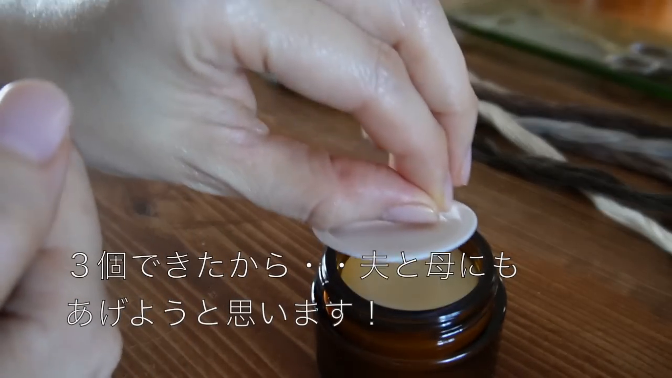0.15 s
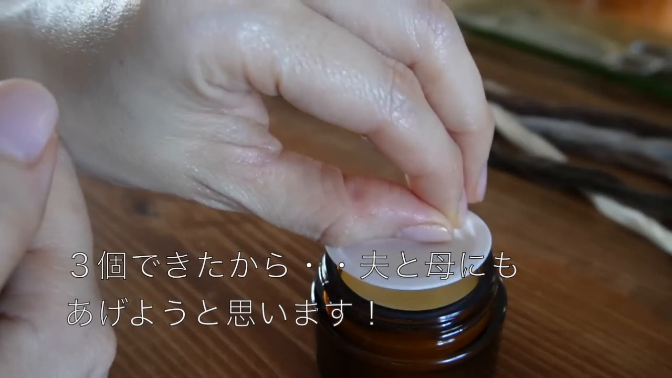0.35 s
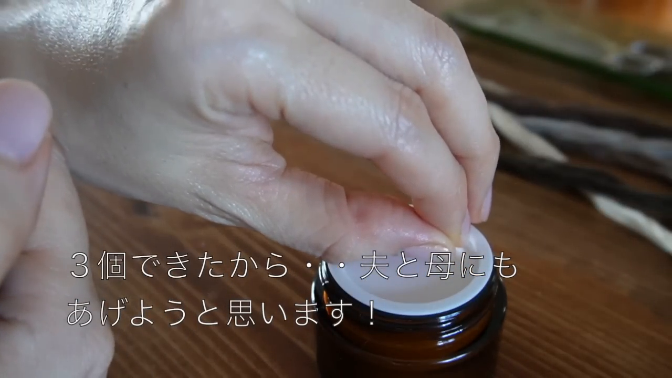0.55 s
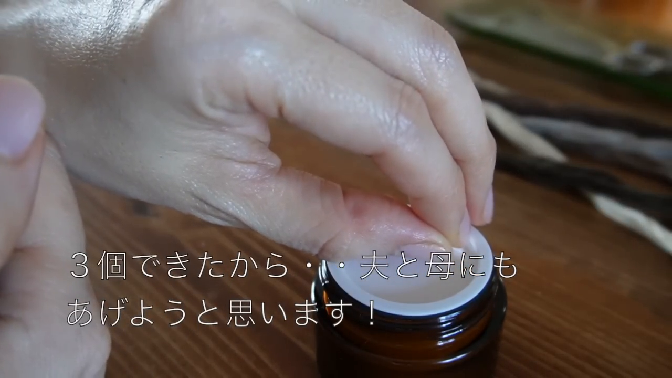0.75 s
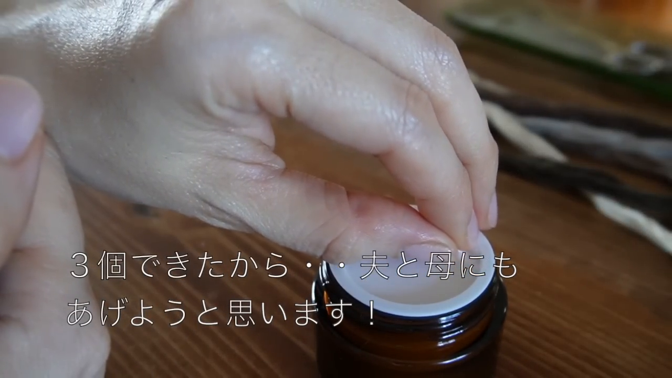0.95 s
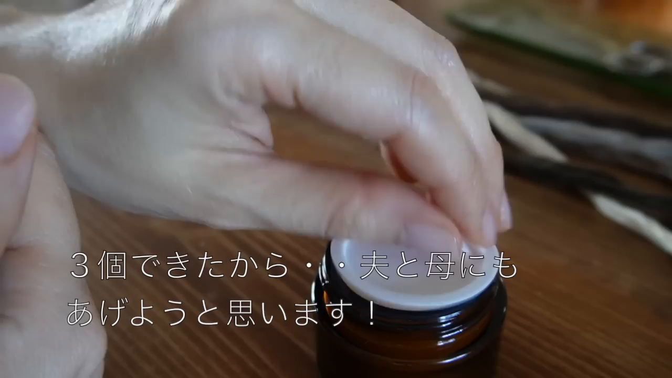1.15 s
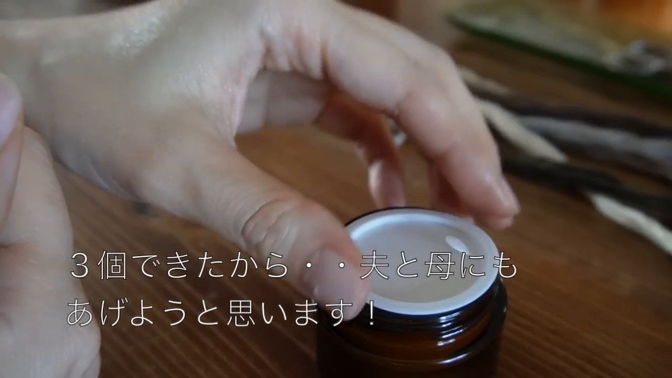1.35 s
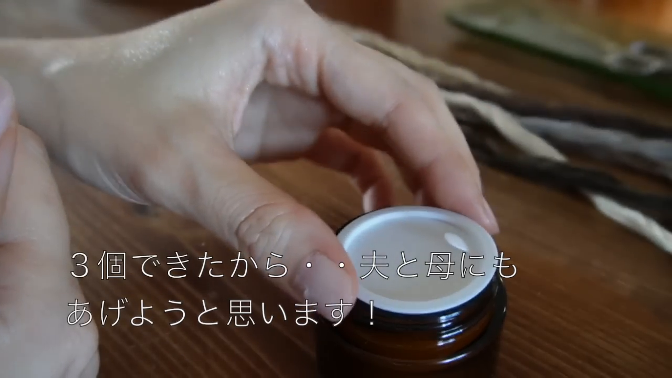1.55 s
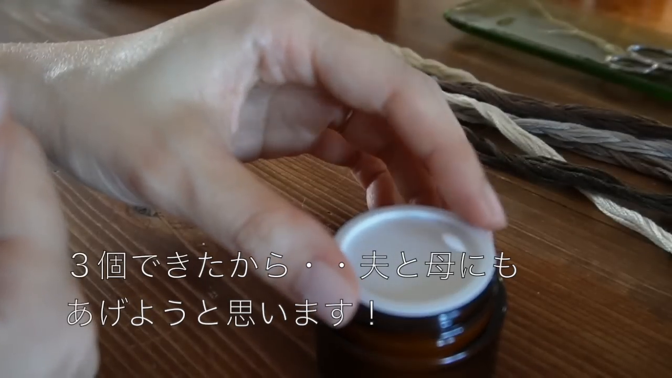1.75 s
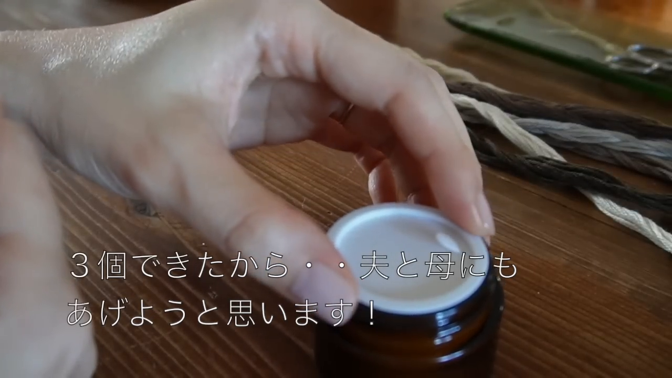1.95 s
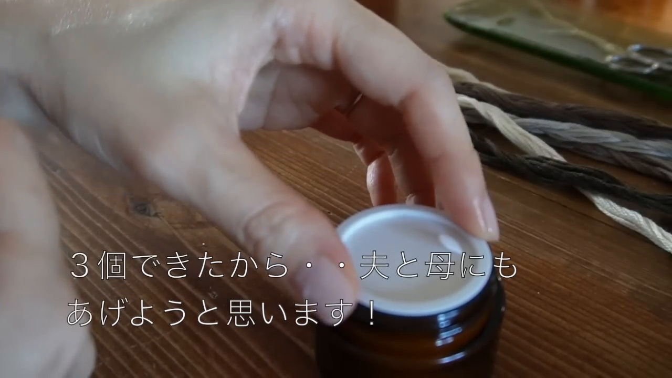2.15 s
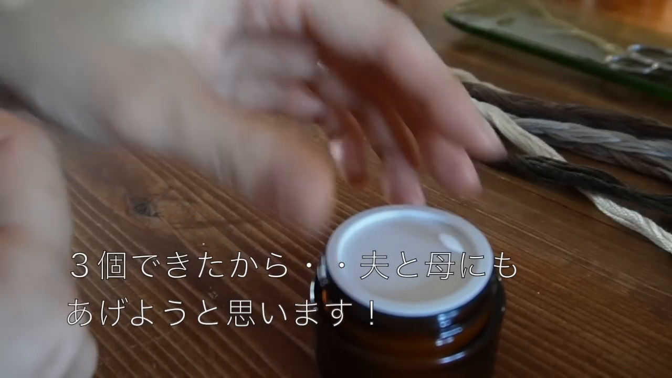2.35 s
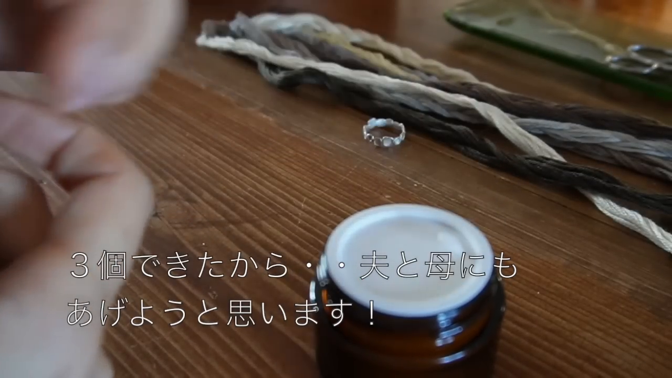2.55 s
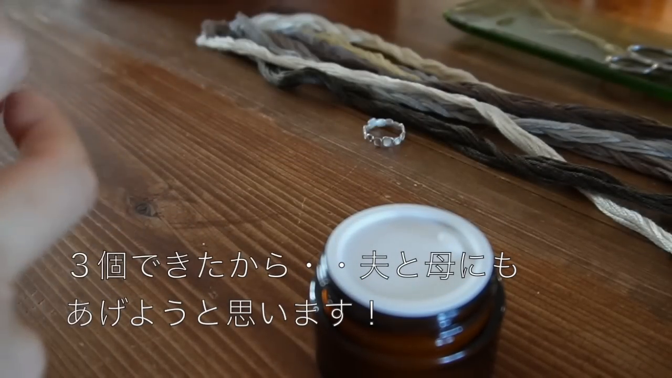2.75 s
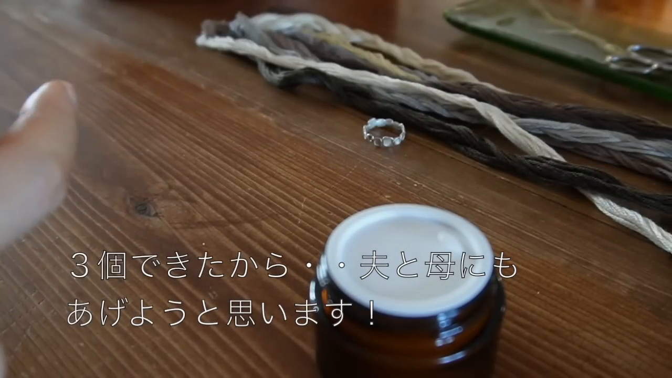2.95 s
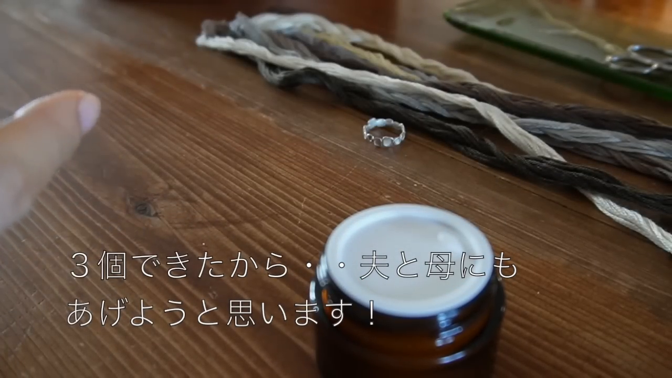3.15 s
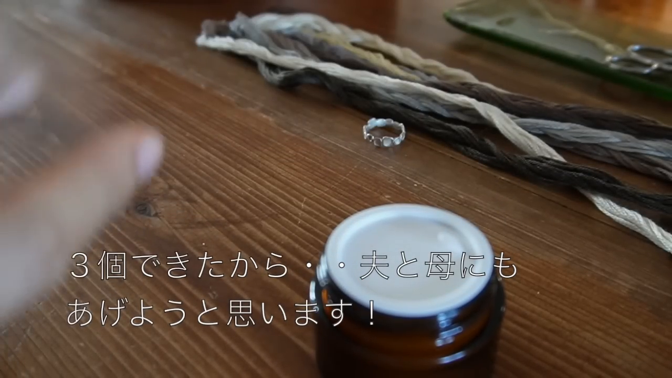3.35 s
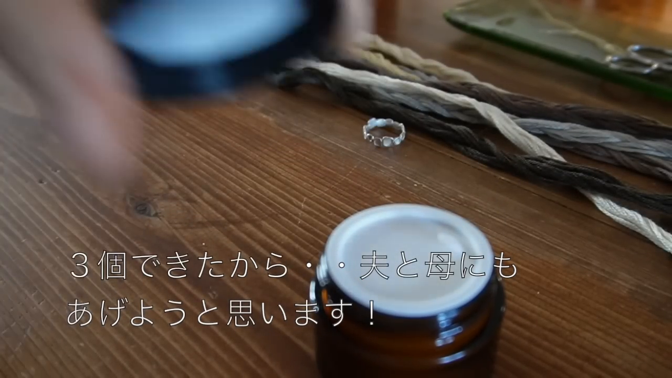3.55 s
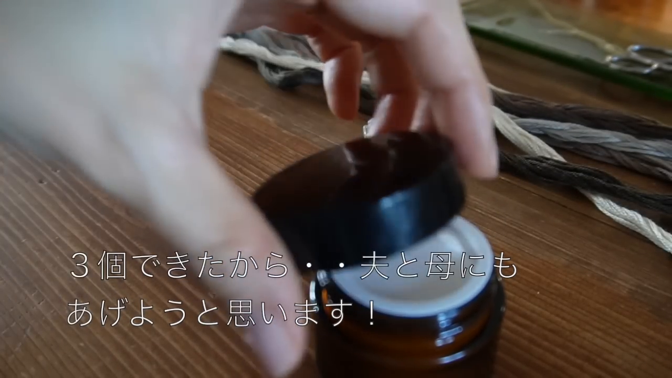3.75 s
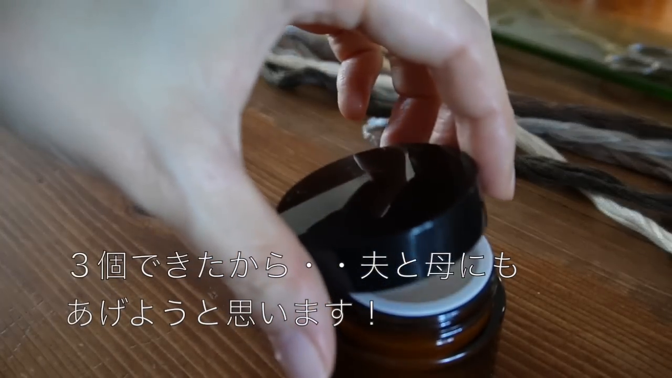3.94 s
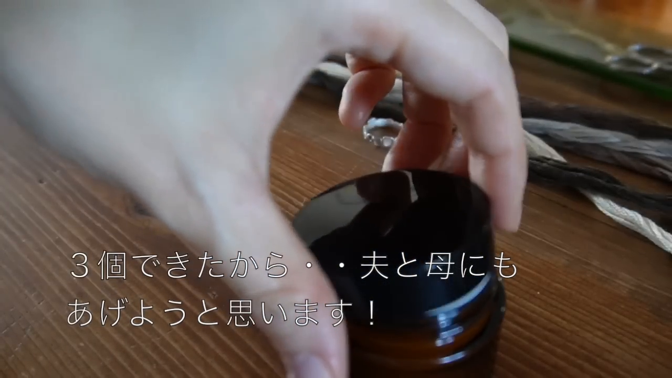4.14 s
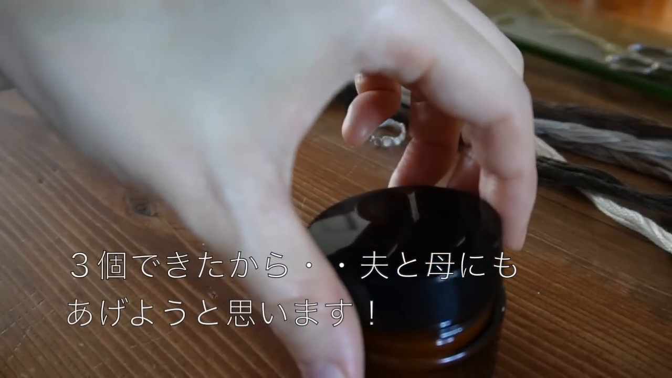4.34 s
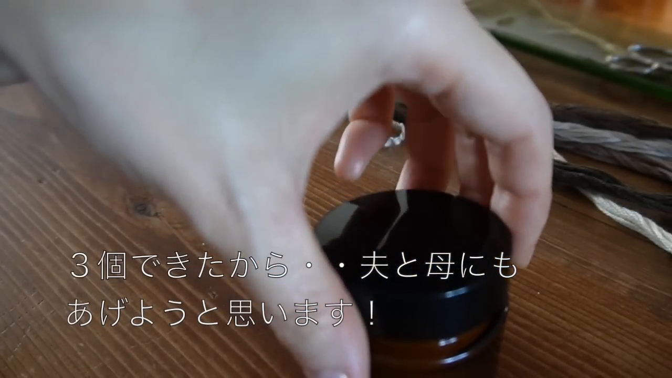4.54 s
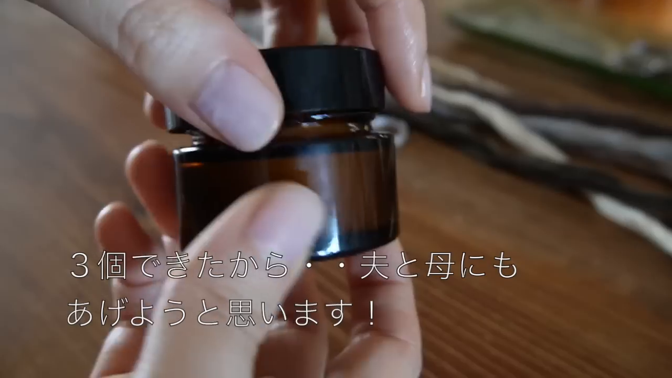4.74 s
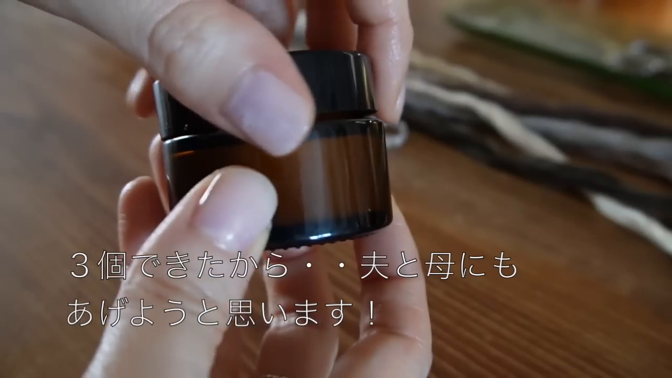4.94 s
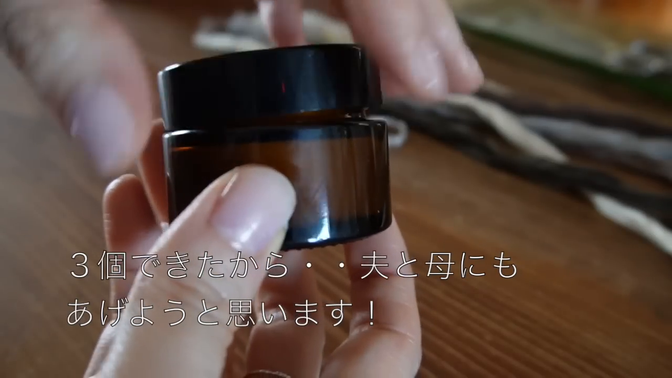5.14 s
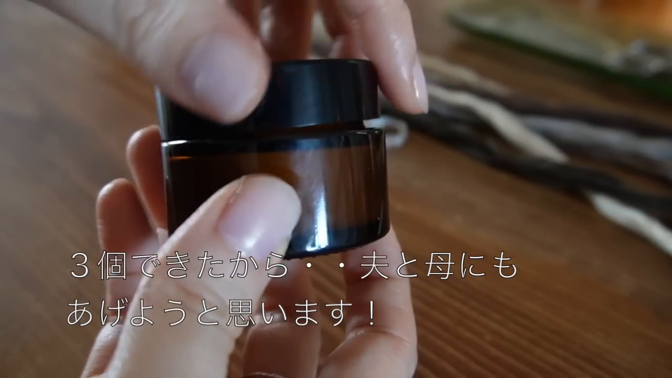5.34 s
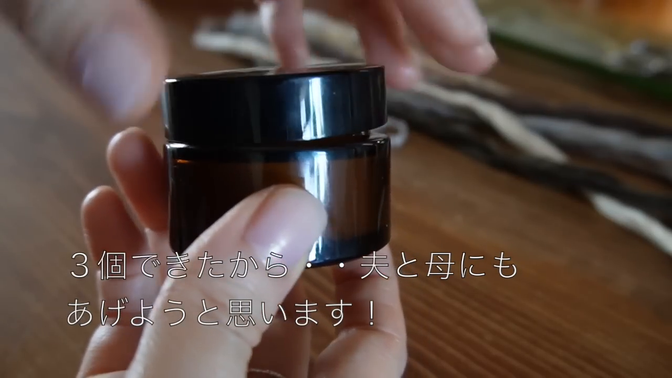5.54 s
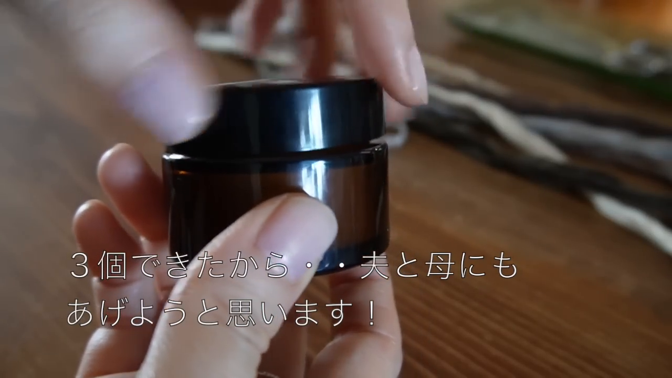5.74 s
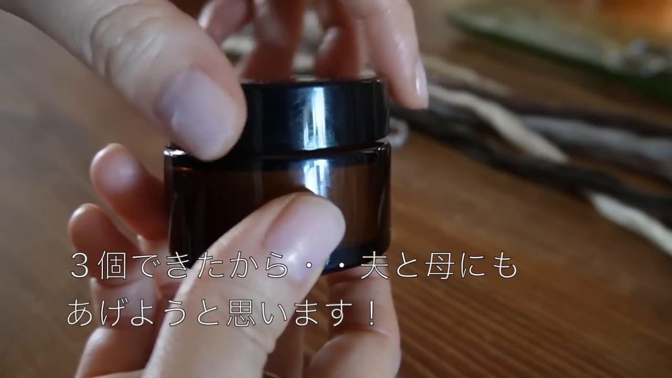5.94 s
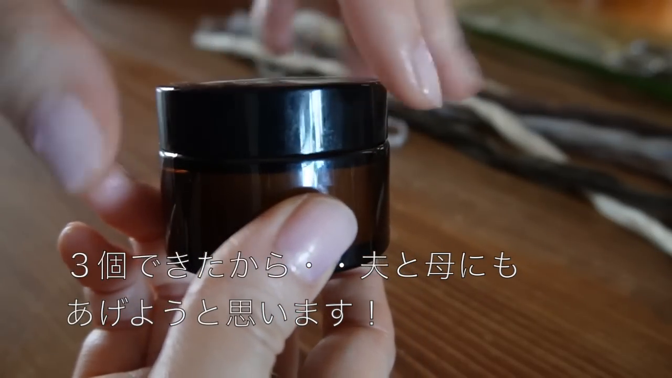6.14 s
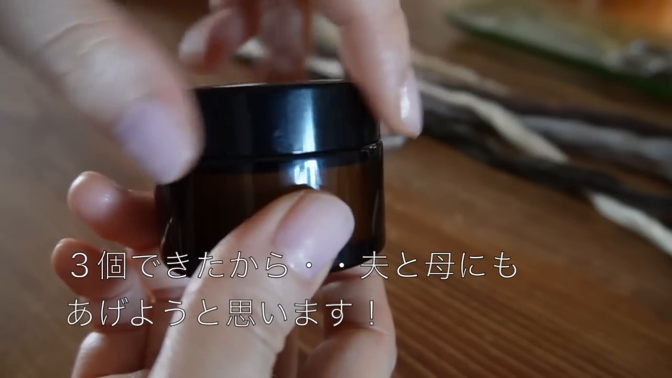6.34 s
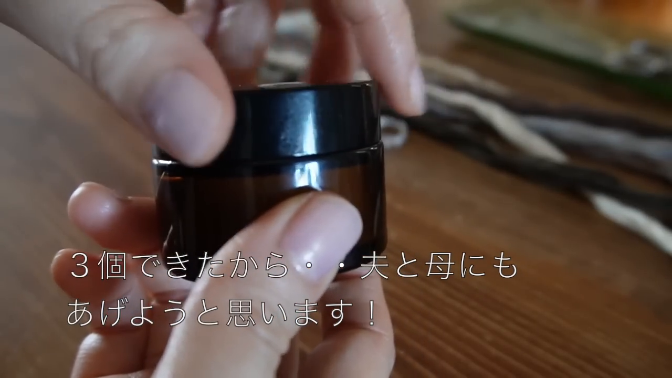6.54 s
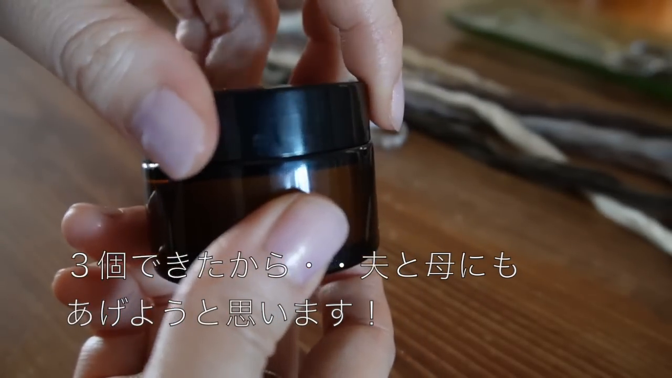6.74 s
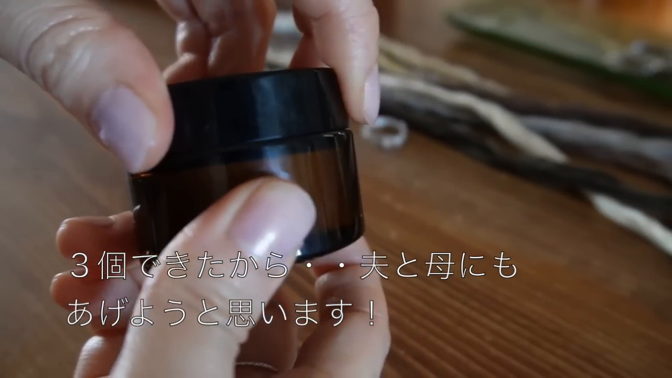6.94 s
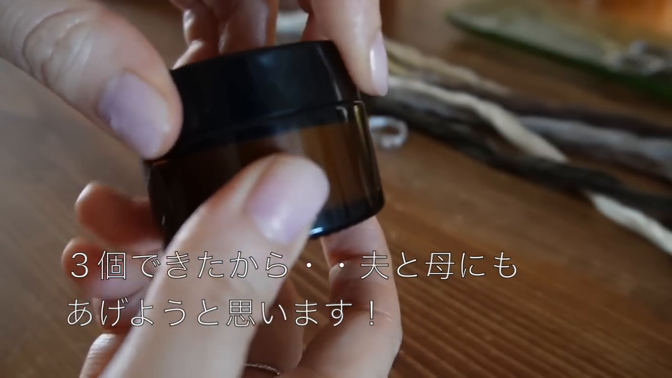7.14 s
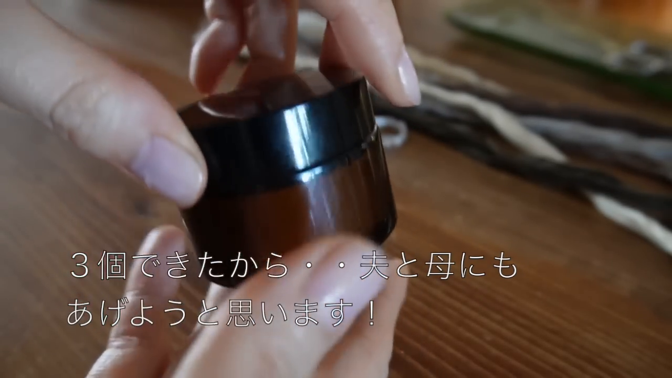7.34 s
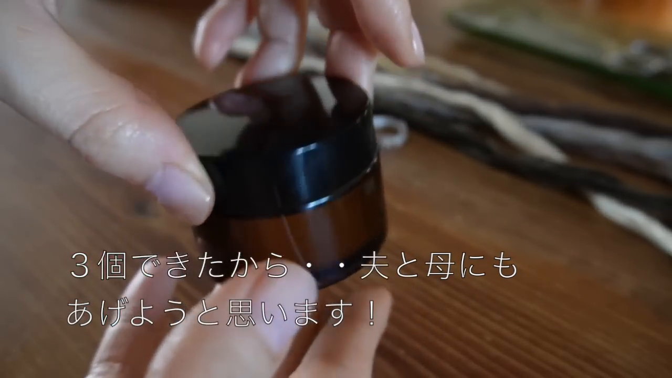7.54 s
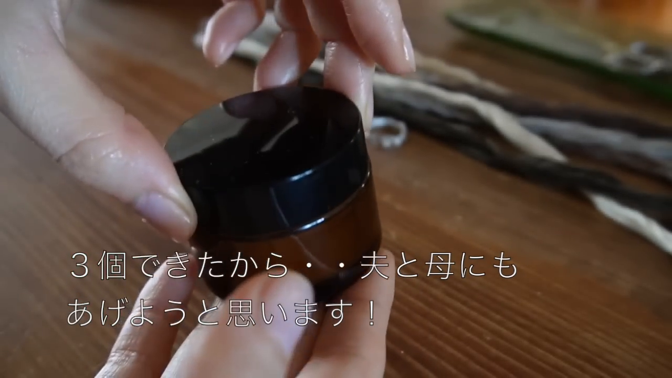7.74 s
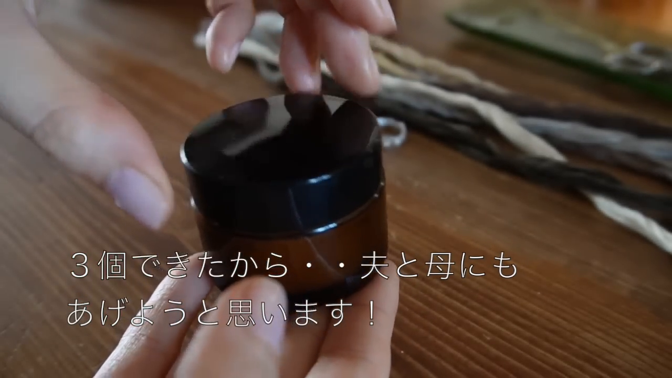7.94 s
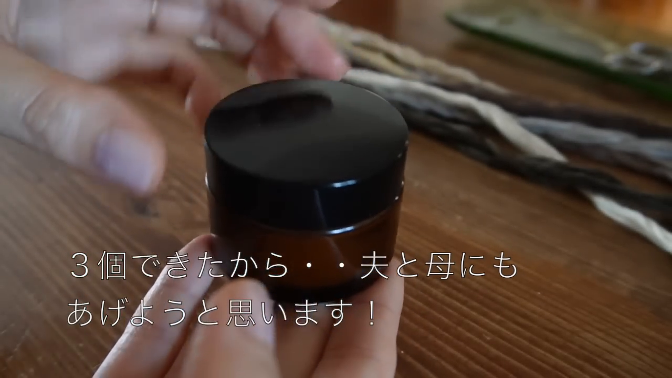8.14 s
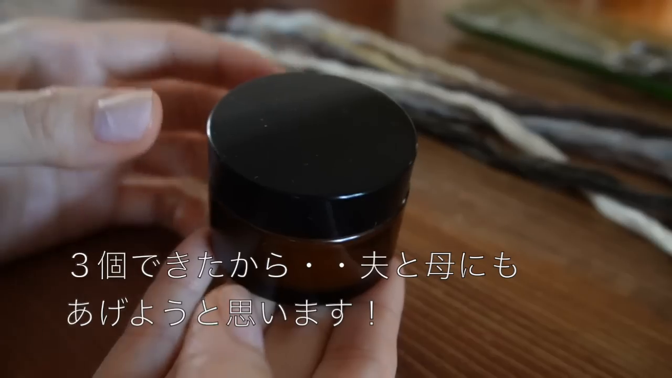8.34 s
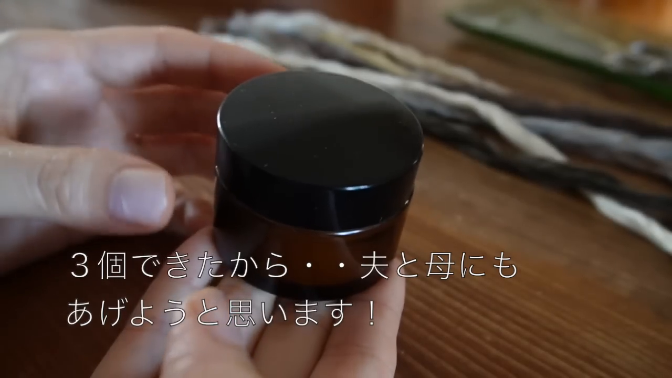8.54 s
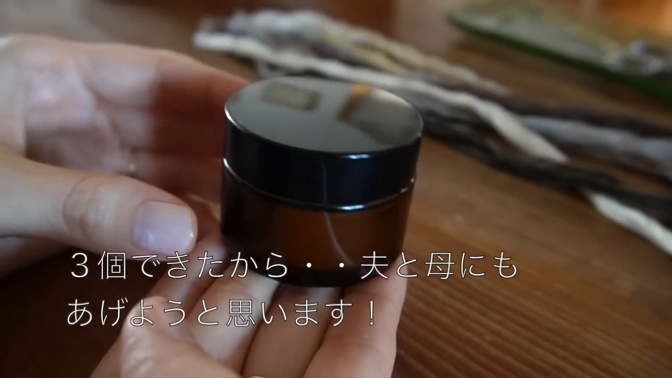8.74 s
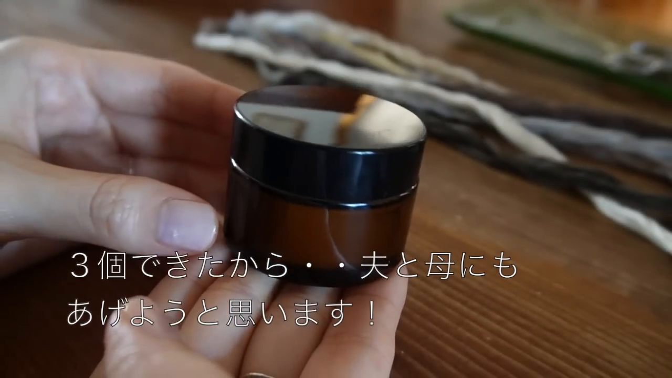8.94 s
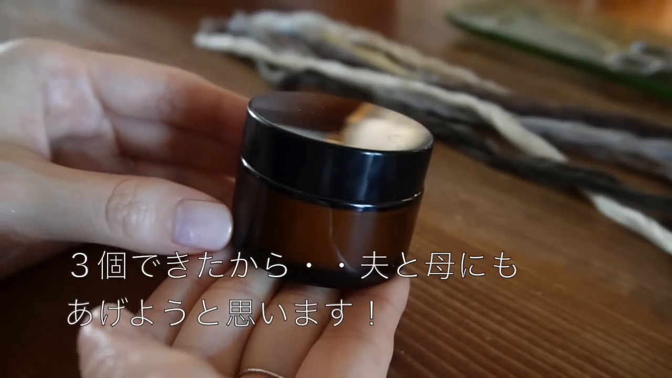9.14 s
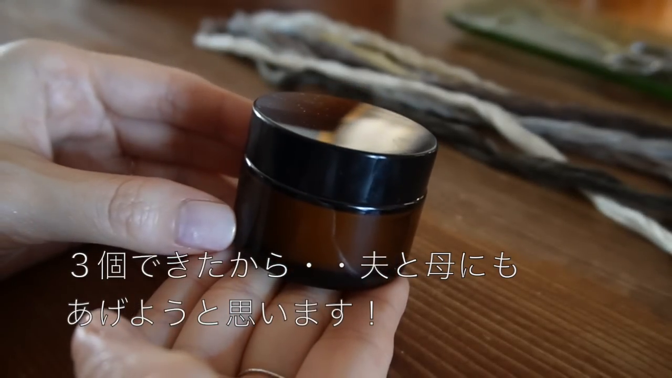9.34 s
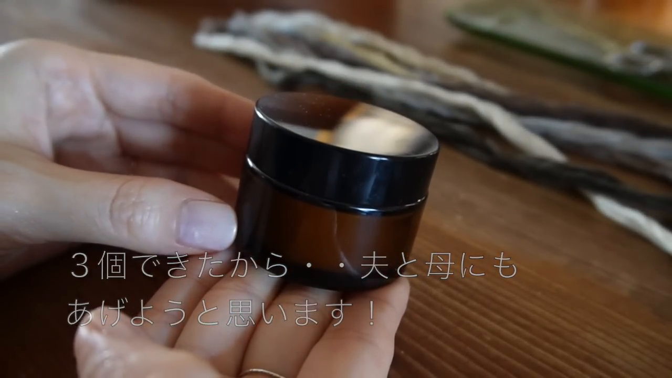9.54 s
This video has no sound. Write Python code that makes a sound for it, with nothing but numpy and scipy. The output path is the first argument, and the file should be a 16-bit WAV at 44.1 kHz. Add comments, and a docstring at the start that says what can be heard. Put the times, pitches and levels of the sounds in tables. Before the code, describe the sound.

A plastic liner snaps into a small glass jar, then a hollow screw cap clacks and scrapes tight over a steady low hum.

```python
"""In a quiet room with a steadily humming appliance, a small glass jar stands on a wooden table.
A plastic liner is pressed into the jar, then a plastic screw cap is set on it and turned down.
Snaps and short rubs ring the liner, the jar and the hollow cap, whose thread catches and slips.
Between the catches the cap scrapes: many tiny slips, coloured by filters.
The hum is a set of wavering tones, the air is filtered noise, and the room adds a short echo."""
import sys
import numpy as np
from scipy import signal
from scipy.fft import rfft, irfft, next_fast_len
from scipy.io import wavfile
from scipy.ndimage import map_coordinates

SR = 44100
rng = np.random.default_rng(int(sys.argv[2]) if len(sys.argv) > 2 else 0)


def file_out(sig):
    """Save sig as 16-bit WAV at sys.argv[1]."""
    # one column per channel
    cols = np.atleast_2d(sig).T
    # limit, then scale
    lim = np.clip(cols, -1, 1)
    pcm = np.round(lim * 32767).astype(np.int16)
    wavfile.write(sys.argv[1], SR, pcm)


N = 427329   # length in samples
TIME = np.arange(N) / SR


def from_db(db):
    """Turn decibels into a gain."""
    return 10 ** (np.asarray(db) / 20)


def rms_one(x):
    """Scale a sound to an rms of 1."""
    return x / np.sqrt(np.mean(x ** 2) + 1e-20)


def at_hz(points, hz):
    """Read a spectrum table between its points, on a log-frequency axis."""
    known_hz, values = np.transpose(points)
    return np.interp(np.log(np.maximum(hz, 1)), np.log(known_hz), values)


def colour(x, points):
    """Filter a sound by a table of f/Hz, gain/dB."""
    size = next_fast_len(x.shape[-1])
    gain = from_db(at_hz(points, np.fft.rfftfreq(size, 1 / SR)))
    return irfft(rfft(x, size) * gain, size)[..., :x.shape[-1]]


def band(x, low_hz, high_hz):
    """Keep the sound between two frequencies, with gentle edges."""
    return signal.sosfilt(signal.butter(2, [low_hz, high_hz], "band", fs=SR, output="sos"), x)


def add(out, start_s, sound):
    """Mix a sound in at a given time."""
    at = max(round(start_s * SR), 0)
    out[at:at + len(sound)] += sound[:len(out) - at]


def stereo(mid, side):
    """Make left and right from mid and side."""
    return np.array([mid + side, mid - side])


# Colour of the room air: f/Hz, relative level per Hz/dB
AIR_COLOUR = [(25, -13), (50, -11.5), (100, -5.5), (170, 0), (300, 0), (450, -3.5), (700, -8.0), (1000, -9),
              (1350, -8.5), (1900, -16.5), (3500, -22.0), (7000, -29.5), (11000, -33.5), (15000, -36.5)]
# How wide the air is, side against mid: f/Hz, level/dB
AIR_WIDTH = [(50, -14.5), (200, -11.5), (500, -10), (1500, -7), (4000, -3), (14000, -0.5)]


def air():
    """Smooth room noise, alike in both ears in the bass and wider in the treble."""
    mid, side = colour(rng.standard_normal((2, N)), AIR_COLOUR)
    side = colour(rms_one(side), AIR_WIDTH)
    return from_db(-54.5) * stereo(rms_one(mid), side)


def drift(rate):
    """A smooth random curve of rms 1 that changes about rate times a second."""
    coarse = TIME[::100]
    slow = map_coordinates(rng.standard_normal(512), [coarse * rate], order=3, mode="wrap")
    return np.interp(TIME, coarse, rms_one(slow))


# Tones of the appliance: f/Hz, rms level/dB, unsteadiness (0 to 1)
HUM_TONES = [(166.2, -60.5, 0.26), (179, -73, 0.8), (219.4, -54.5, 0.22), (361, -70, 1), (384, -60.5, 0.16),
             (524, -70.5, 1), (1318, -70.5, 0.02), (1426, -69, 0.99)]


def hum(waver_per_s):
    """Motor tones, each a steady part plus a part that wavers in level and phase."""
    out = np.zeros(N)
    for hz, level_db, unsteady in HUM_TONES:
        waver = (drift(waver_per_s) + 1j * drift(waver_per_s)) / np.sqrt(2)
        carrier = np.exp(2j * np.pi * (hz * TIME + rng.random()))
        steady = np.sqrt(1 - unsteady ** 2)
        tone = np.real((steady + unsteady * waver) * carrier)
        out += from_db(level_db) * rms_one(tone)
    return out


# Colour of the room's echo, against the direct sound: f/Hz, level/dB
ECHO_COLOUR = [(250, -8), (900, -9), (1800, -17.5), (3300, -13.5), (5500, -10), (8000, -10), (14000, -12)]


def room(x, t60, treble_t60, first_echo_s, width):
    """A diffuse tail that builds up around the first echo and dies sooner in the treble."""
    t = TIME[:SR * 3 // 4]
    mid, side = rng.standard_normal((2, len(t)))
    noise = stereo(mid, width * side)
    lows = signal.sosfilt(signal.butter(1, 5000, fs=SR, output="sos"), noise)
    treble = noise - lows
    # t60 is the time in seconds to fall by 60 dB
    tail = lows * from_db(-60 * t / t60) + treble * from_db(-60 * t / treble_t60)
    tail *= np.clip(t / first_echo_s - 1 / 2, 0, 1)
    tail /= np.linalg.norm(tail, axis=1, keepdims=True)
    return signal.fftconvolve(colour(x, ECHO_COLOUR)[None], tail, axes=1)[:, :N]


# How wide the jar sounds, side against mid: f/Hz, level/dB
JAR_WIDTH = [(500, -25.5), (1500, -30.5), (3000, -35), (6000, -12), (12000, -9.5)]
# How the jar leans, left minus right: f/Hz, level/dB
JAR_LEAN = [(500, -0.6), (1800, 1), (5000, 1.5), (9000, 0), (14000, 0)]


def near_field(x):
    """Direct sound leans a little to one side; hands and table scatter it differently to each ear."""
    t = TIME[:SR // 50]
    scatter = rng.standard_normal(len(t)) * np.exp(-t / 0.003)
    scatter *= t > 0.0004   # scattered sound arrives a little late
    scattered = signal.fftconvolve(x, scatter / np.linalg.norm(scatter))[:N]
    side = colour(scattered, JAR_WIDTH)
    left = colour(x, [(hz, db / 2) for hz, db in JAR_LEAN])
    right = colour(x, [(hz, -db / 2) for hz, db in JAR_LEAN])
    return np.array([left, right]) + stereo(0, side)


def slips(size, per_s, spread_db):
    """Tiny stick-slip impulses of uneven size at random moments, with an rms of 1."""
    born = rng.random(size) < per_s / SR
    uneven = from_db(spread_db * rng.standard_normal(size))
    return rms_one(born * rng.standard_normal(size) * uneven)


def scrapes(table, timbre, flutter_db):
    """Dense slips swell and fade in each stroke; their colour flutters as the contact point moves."""
    out, t = np.zeros(N), TIME[:SR // 2] - 1 / 4   # the peak is at t = 0
    edges = np.geomspace(400, 15000, num=11)   # ten bands, in Hz
    for peak_s, rise_s, fall_s, level_db, tilt_db in table:
        grit = np.zeros(len(t))
        for low, high in zip(edges, edges[1:]):
            flutter = np.interp(t, np.linspace(t[0], t[-1], num=70), rng.standard_normal(70))
            grains = band(slips(len(t), per_s=4000, spread_db=6.5), low, high)
            grit += grains * from_db(flutter_db * flutter)
        grit = colour(grit, [(hz, db + tilt_db * np.log2(hz)) for hz, db in timbre])
        stroke = np.exp(-np.abs(t / np.where(t < 0, rise_s, fall_s)) ** 1.8)
        add(out, peak_s + t[0], from_db(level_db) * rms_one(grit) * stroke)
    return out


# Loose glides: peak t/s, rise t/s, fall t/s, level/dB, treble tilt per octave/dB
GLIDE_STROKES = [(.5, 0.083, 0.064, -60.5, -7), (5.066, 0.036, 0.091, -45, -2.5),
                 (5.42, 0.047, 0.031, -41, -4.5), (5.478, 0.061, 0.018, -44, -1)]
# Their thin, hissing colour before the tilt: f/Hz, relative level per Hz/dB
GLIDE_HISS = [(200, -25), (600, -8.5), (850, -0.5), (1300, -3), (1800, 3.5), (2400, -5), (3300, 0),
              (4200, 2), (5600, 2), (7000, -7.5), (8200, -7), (11000, -11.5), (15000, -31)]


def glides():
    """Plastic glides loosely on glass: dense slips with a thin hiss."""
    return scrapes(GLIDE_STROKES, GLIDE_HISS, flutter_db=1)


# Grinds under pressure: peak t/s, rise t/s, fall t/s, level/dB, treble tilt per octave/dB
GRIND_STROKES = [(4.375, 0.037, 0.048, -53.5, -9), (5.792, 0.034, .016, -30, -4),
                 (6.032, 0.023, .008, -45, -3), (6.067, 0.026, 0.018, -33, -2),
                 (6.353, 0.026, 0.0083, -44.5, -3.5)]
# Their fuller colour before the tilt: f/Hz, relative level per Hz/dB
GRIND_CRUNCH = [(200, -27), (550, -21), (850, -8), (1250, -2.5), (1900, -1), (2400, -4.5), (3300, -8.5),
                (4200, -9.5), (5100, -4.5), (6500, -15), (8200, -14.5), (11000, -20), (15000, -38)]


def grinds():
    """The cap grinds under pressure: dense slips with a fuller colour and more flutter."""
    return scrapes(GRIND_STROKES, GRIND_CRUNCH, flutter_db=2.5)


def ring(force, hz, t60):
    """One mode: a unit click sets a sine of about height 1 ringing, and it dies away."""
    decay = from_db(-60 / (t60 * SR))   # gain per sample
    turn = 2 * np.pi * hz / SR   # radians per sample
    feedback = [1, -2 * decay * np.cos(turn), decay ** 2]
    return signal.lfilter([0, np.sin(turn)], feedback, force + 1e-18)


def rub_and_snap(t, rub_s, snap, grain_db):
    """The push of one contact: a rub of tiny slips that bites and fades, plus a click at its start."""
    rub = slips(len(t), per_s=10000, spread_db=grain_db) * np.exp(-(t / rub_s) ** 2)
    rub *= 1 - np.exp(-t / (0.18 * rub_s))   # it takes part of its length to bite
    force = rub / (np.linalg.norm(rub) + 1e-9)
    force[0] += snap / (1 + (rub_s / 0.002) ** 2)   # long rubs start softly
    return force


# Borders of the four registers thud, hollow, clack and tick: f/Hz
REGISTER_BORDERS = [250, 1550, 2200, 4500, 12000]
# How strongly each kind of contact speaks in each of the four registers: level/dB
REGISTER_VOICES = {"liner": [-1.5, -20, -1.5, -10], "knock": [1, -9.5, -4.5, -19], "catch": [-12, -1, -8.5,
                   -14.5], "slip": [-4.5, -1, -4.5, -3]}
# A brighter contact trades thud and hollow for clack and tick: share of brightness gained per register
BRIGHTNESS_SHARES = [-0.41, -0.3, 0.47, 0.83]
# Dry crack of heavily damped modes against the ringing ones, before each kind's offset: level/dB
CRACK_LEVELS = [-13, -6.5, -2.5, -3]


def contacts(table, modes, kind, crack_db, snap, grain_db, soft_hz, low_cut_hz, detune):
    """Each contact drives the modes; its level and brightness set how loud each register is."""
    out, t = np.zeros(N), TIME[:SR // 14]
    mode_hz, mode_db, mode_t60 = np.transpose(modes)
    register = np.digitize(mode_hz, REGISTER_BORDERS[1:-1])
    softness = signal.butter(6, soft_hz, fs=SR, output="sos")   # plastic gives a little
    # a small object radiates little bass
    small_body = signal.butter(2, low_cut_hz, "high", fs=SR, output="sos")
    for start_s, rub_s, contact_db, bright_db in table:
        force = rub_and_snap(t, rub_s, snap, grain_db)
        force = signal.sosfilt(np.vstack([softness, small_body]), force)
        # the fingers load the modes differently each time, the high ones most
        load = detune * np.sqrt(mode_hz / 1000) * rng.standard_normal(len(modes))
        loaded_modes = zip(mode_hz * (1 + load), mode_db, mode_t60)
        rings = np.array([from_db(db) * ring(force, hz, t60) for hz, db, t60 in loaded_modes])
        for k, register_db in enumerate(REGISTER_VOICES[kind]):
            low, high = REGISTER_BORDERS[k], REGISTER_BORDERS[k + 1]
            ringing = band(rings[register == k].sum(axis=0), low / 1.3, high * 1.15)
            crack = from_db(CRACK_LEVELS[k] + crack_db) * rms_one(band(force, low, high))
            voice = rms_one(ringing) + crack
            voice *= np.sqrt(SR / 100) / np.linalg.norm(voice)   # as much energy as rms 1 for 10 ms
            level_db = contact_db + register_db + BRIGHTNESS_SHARES[k] * bright_db
            add(out, start_s, from_db(level_db) * voice)
    return out


# Liner pressed in and touched: t/s, rub length t/s, level/dB, brightness/dB
LINER_TOUCHES = [(.556, 0.003, -43.5, -8.5), (1.2192, 0.00091, -31, 3.5), (1.228, 0.0086, -43, 3),
                 (1.2494, 0.00049, -43, 5), (1.2575, .003, -46, -4), (1.51, 0.0017, -49.5, -8),
                 (1.798, 0.0023, -58.5, -13), (2.308, 0.0044, -66, 12), (2.606, .0022, -66, 11),
                 (2.853, .012, -63, 6)]
# Modes of the liner in the jar's mouth, before finger load: f/Hz, relative level/dB, 60 dB decay t/s
LINER_RINGS = [(291, 24.5, 0.14), (1296, -9, 0.06), (1335, 45, 0.017), (1960, 0, 0.0036), (2640, 11, 0.018),
               (3430, 2, 0.012), (4130, 14, 0.0073), (5200, 5, 0.0086), (6130, 7, 0.006), (7100, 1, 0.0033),
               (9400, -9, 0.0098)]


def liner():
    """The liner snaps and rubs in the jar's mouth and rings its own modes."""
    return contacts(LINER_TOUCHES, LINER_RINGS, "liner", crack_db=-4, snap=1.2, grain_db=4.5,
                    soft_hz=10500, low_cut_hz=260, detune=0.023)


# Cap's rim knocking on the jar: t/s, rub length t/s, level/dB, brightness/dB
RIM_KNOCKS = [(4.277, 0.014, -40, -2.5), (4.3003, .002, -40, -14), (4.34, .002, -51, 2),
              (4.4125, 0.0013, -42.5, 4.5), (4.4555, 0.0011, -38.5, 8), (4.4932, 0.0011, -33.5, 5),
              (6.0372, 0.00038, -36.5, -10), (6.353, 0.0046, -38, 2)]
# Modes of the cap resting on the jar, before finger load: f/Hz, relative level/dB, 60 dB decay t/s
JAR_RINGS = [(305, -2.5, 0.022), (570, -36.5, .012), (1275, 5, 0.027), (1333, -5, 0.063), (1700, -16, .008),
             (1960, 15, 0.013), (2340, 7, 0.024), (3170, 9, 0.0075), (3400, 7, 0.013), (4680, 16, 0.01),
             (5090, 13, 0.024), (6500, 4, 0.013), (9500, -19, .007)]


def knocks():
    """The cap's rim knocks on the jar and rings the two together."""
    return contacts(RIM_KNOCKS, JAR_RINGS, "knock", crack_db=0, snap=1.4, grain_db=2,
                    soft_hz=9900, low_cut_hz=460, detune=0.019)


# Thread dropping against the glass with a hollow clack: t/s, level/dB, brightness/dB
THREAD_CATCHES = [(4.7977, -26.5, -1.5), (4.847, -47.5, 4), (4.9037, -39.5, 3.5), (5.1467, -19, -3),
                  (5.1603, -15.5, 3.5), (5.1642, -15, 2.5), (5.174, -22, -5), (5.1875, -21.5, 1),
                  (5.3362, -24.5, 4), (5.379, -42, 1), (5.5356, -15, 7), (5.7376, -41, -17),
                  (5.753, -25, -3)]
# Thread dragging over the glass with a rasp: t/s, rub length t/s, level/dB, brightness/dB
THREAD_SLIPS = [(4.7755, 0.008, -32.5, -7.5), (5.1155, 0.0037, -30, -5), (5.1195, 0.0093, -24, 5.5),
                (5.132, .004, -32, 3), (5.5005, 0.0069, -26, -9), (5.5087, 0.015, -26, -1.5),
                (5.7472, 0.0027, -21, 1), (5.78, 0.0019, -27.5, -7.5), (5.789, .009, -35, -6)]
# Modes of the cap and the air under it, before finger load: f/Hz, relative level/dB, 60 dB decay t/s
CAP_RINGS = [(890, 0, 0.031), (1188, 11, .016), (1293, -5.5, .025), (1720, -14, .025), (1790, 15, .034),
             (1862, 9, .025), (3270, 22, .03), (2850, 6, .014), (3390, 17.5, 0.019), (3790, 20, 0.014),
             (4500, 6, 0.0088), (5190, 3, .007), (6380, -0.5, 0.0081), (7170, -0.5, .005),
             (8100, -1.5, .012), (10300, -8.5, 0.0075)]


def thread():
    """The turning cap rasps over the glass thread and drops into it; both ring the cap."""
    # every catch is equally brief: a rub of 0.0026 s
    drops = [(s, 0.0026, level_db, bright_db) for s, level_db, bright_db in THREAD_CATCHES]
    clacks = contacts(drops, CAP_RINGS, "catch", crack_db=-3.5, snap=1.73, grain_db=3,
                      soft_hz=12300, low_cut_hz=1700, detune=0.008)
    rasps = contacts(THREAD_SLIPS, CAP_RINGS, "slip", crack_db=0.5, snap=2.5, grain_db=3.5,
                     soft_hz=12400, low_cut_hz=1050, detune=0.008)
    return clacks + rasps


def scene():
    """The jar close by, in a humming room."""
    jar = glides() + grinds() + liner() + knocks() + thread()
    echo = room(jar, t60=0.49, treble_t60=0.27, first_echo_s=0.0041, width=0.29)
    return air() + hum(waver_per_s=12) + echo + near_field(jar)


def record(dry):
    """The recorder drops the deepest bass and cuts the top."""
    thin = signal.sosfilt(signal.butter(2, 35, "high", fs=SR, output="sos"), dry)
    return signal.sosfilt(signal.ellip(10, 0.1, 90, 15900, fs=SR, output="sos"), thin)


dry = scene()
out = record(dry)
file_out(out)
```